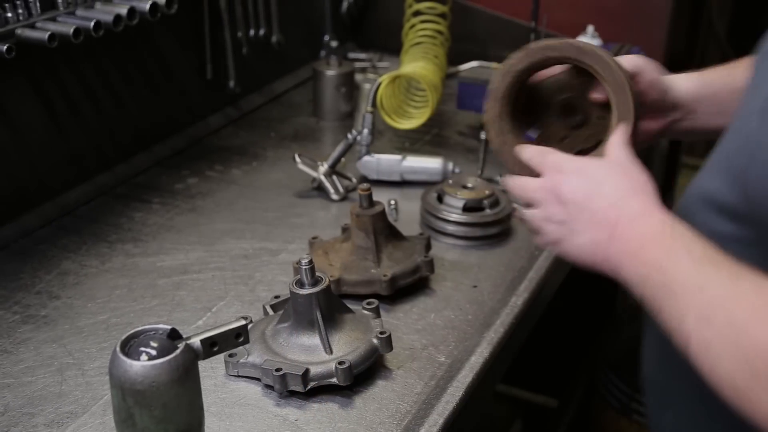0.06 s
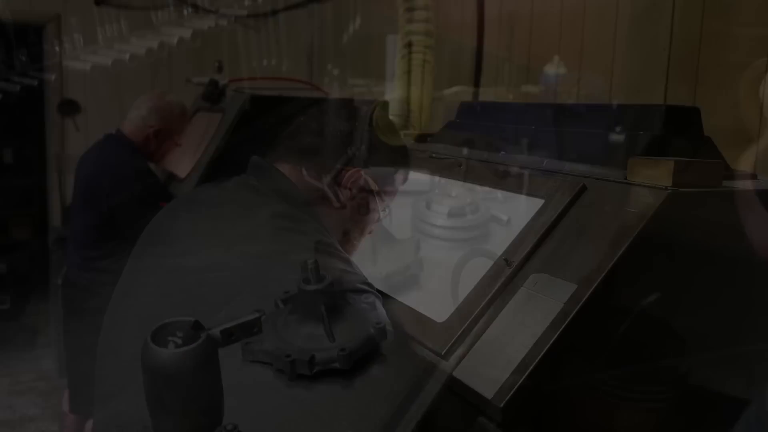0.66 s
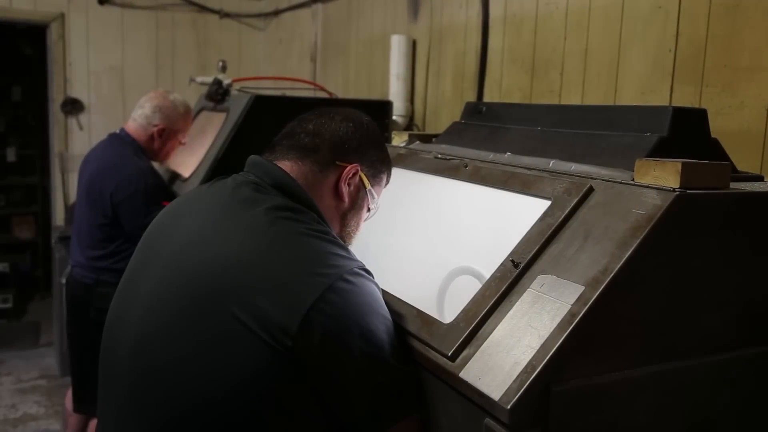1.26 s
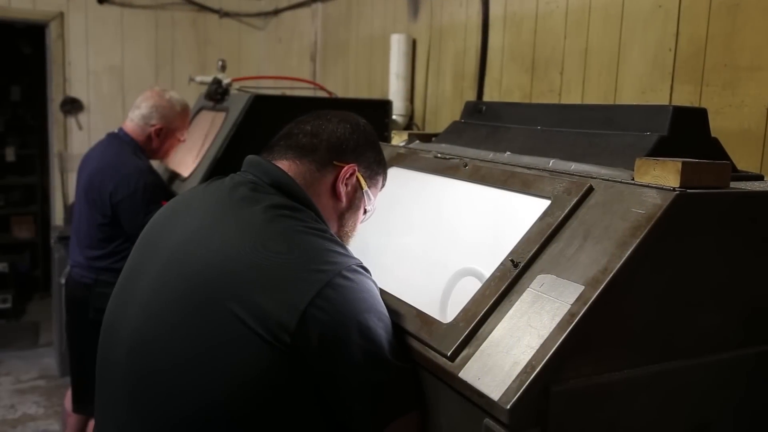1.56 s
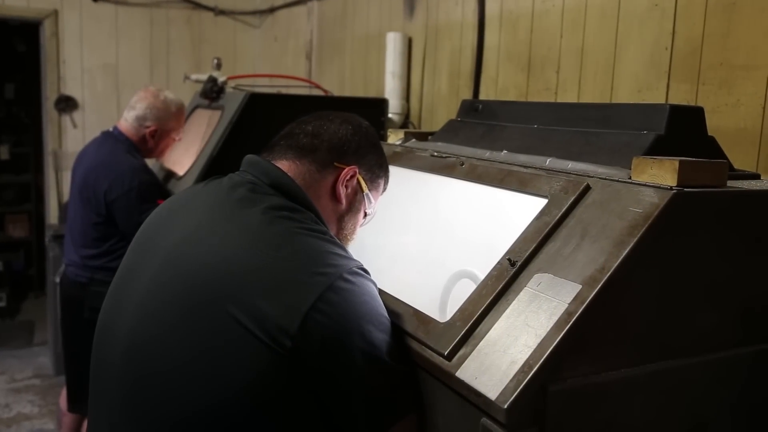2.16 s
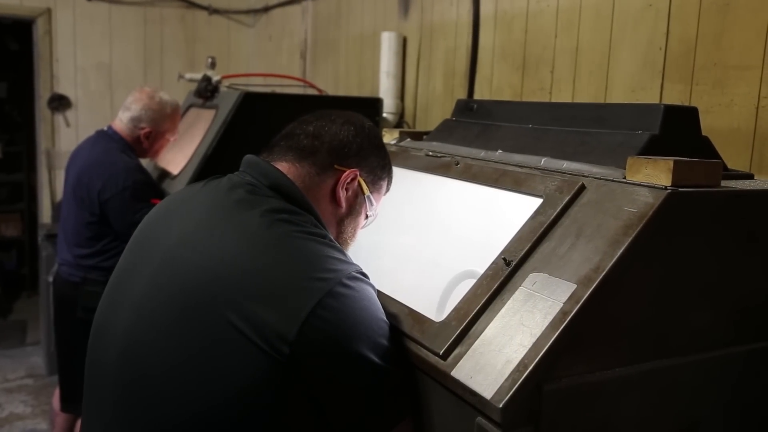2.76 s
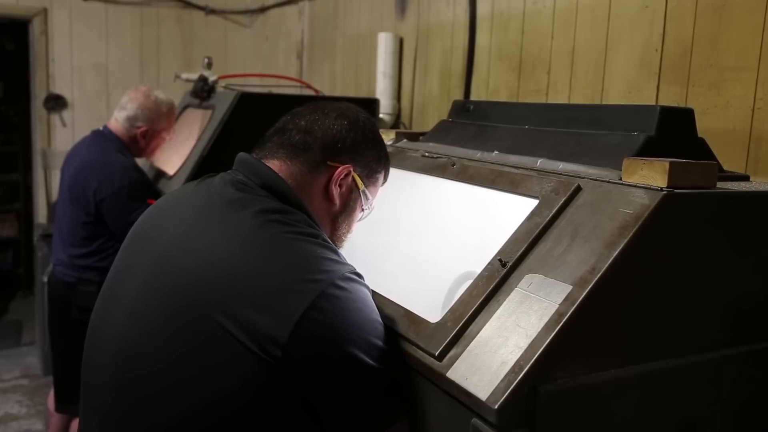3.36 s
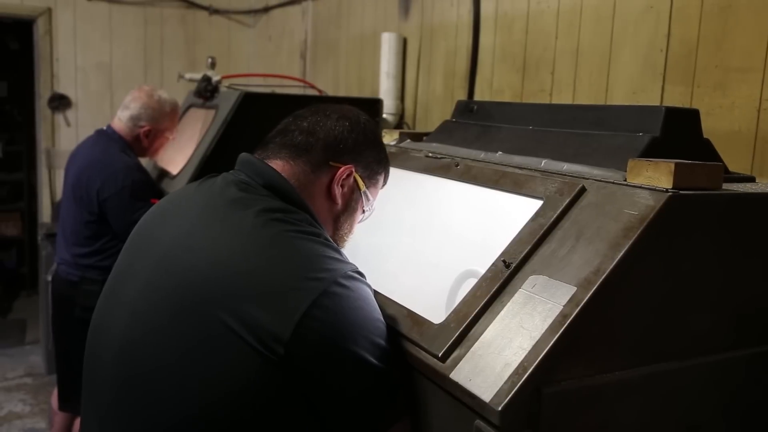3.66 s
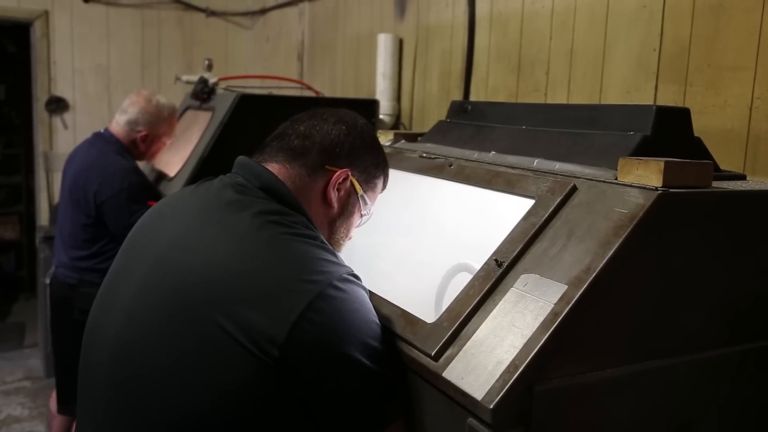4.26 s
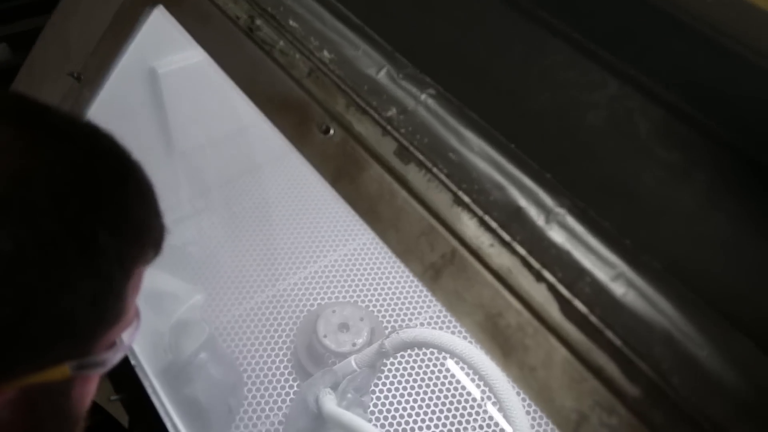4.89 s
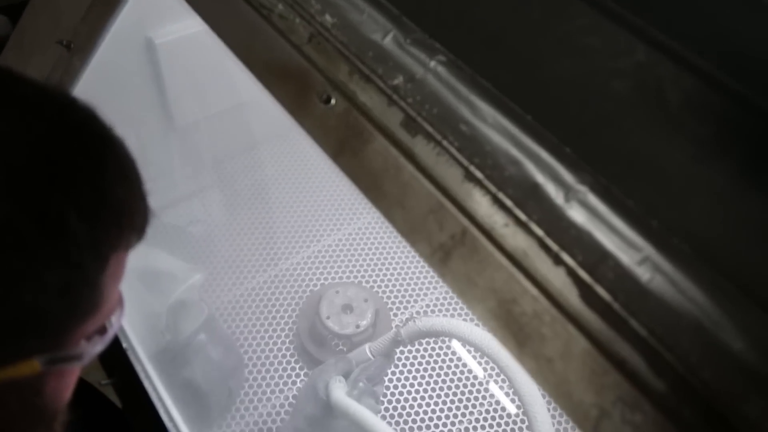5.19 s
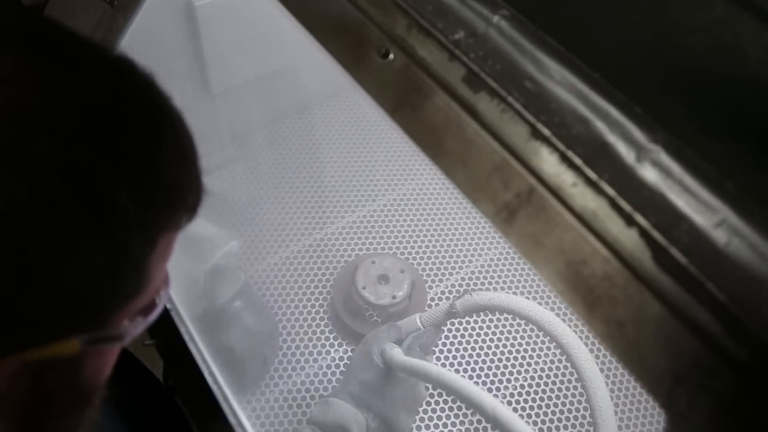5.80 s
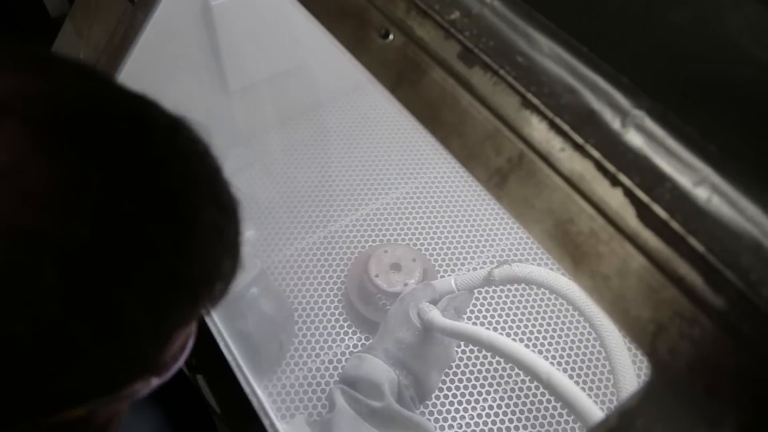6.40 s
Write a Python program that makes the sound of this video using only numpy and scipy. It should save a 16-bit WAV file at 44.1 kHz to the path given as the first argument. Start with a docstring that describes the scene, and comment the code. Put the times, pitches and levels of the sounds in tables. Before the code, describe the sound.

In a workshop, an air jet blasts grit against a metal part in a cabinet, making a steady hiss with a rushing body and a few short, faint whistles. An extractor fan's hum comes up within the first second and stays. The tone changes abruptly as the microphone position shifts, ending close to the spray, where a thin, bright sizzle swells in quick surges over a faint whine.

```python
"""Grit blasting in a steel cabinet

A metal part is blasted in a workshop, heard in mono from four places, one straight after the other:
the workbench, behind the operator, at the cabinet window, and a thin close-up of the spray.
The air jet roars, hisses and sings on the part's edges, grit sizzles on the metal as the nozzle sweeps,
and the dust extractor's fan hums at a steady pitch."""
import sys
import numpy as np
from scipy import signal
from scipy.fft import rfft, irfft
from scipy.io import wavfile
from scipy.ndimage import uniform_filter1d

SR = 44100
rng = np.random.default_rng(int(sys.argv[2]) if len(sys.argv) > 2 else 0)


def log_audio(samples):
    """Write samples as a 16-bit WAV file to the path given in sys.argv[1]."""
    # one column per channel
    frames = np.atleast_2d(samples).T
    # limit to full scale, then quantise
    limited = np.clip(frames, -1, 1)
    pcm = np.round(limited * 32767).astype(np.int16)
    wavfile.write(sys.argv[1], SR, pcm)


N = 292824
TIME = np.arange(N) / SR
FREQS = np.maximum(np.fft.rfftfreq(N, 1 / SR), 1)

# cuts from one listening place to the next: (time [s])
CUT_TIMES = [0.960, 4.432, 5.665]


def from_db(db):
    """Decibels to gain."""
    return np.exp(np.asarray(db) * (np.log(10) / 20))


def unit_rms(x):
    """Scale to unit rms."""
    return x / np.sqrt(np.mean(x ** 2) + 1e-20)


def automation(points):
    """Straight lines through (time, value) points, at every sample."""
    return np.interp(TIME, *np.transpose(points))


def drift(rate_hz):
    """Smooth random motion of unit rms, mostly slower than rate_hz."""
    step = 100
    size = N // step + 1
    rolloff = 1 + (np.fft.rfftfreq(size, step / SR) / rate_hz) ** 2
    slow = irfft(rfft(rng.standard_normal(size)) / rolloff, size)
    return np.interp(np.arange(N) / step, np.arange(size), unit_rms(slow))


def coloured(x, response):
    """x through a frequency response, at unit rms."""
    return unit_rms(irfft(rfft(x) * response, N))


def fan(partials, waver_db, wander):
    """Blade-passing tones: the speed barely wanders, and each partial wavers in the turbulent flow."""
    blade_hz = 354.65
    phase = 2 * np.pi * np.cumsum(blade_hz * (1 + wander * drift(5.5))) / SR
    out = np.zeros(N)
    for harmonic, db in partials:
        level = from_db(db + waver_db * drift(8.1))
        out += level * np.sqrt(2) * np.sin(harmonic * phase + 2 * np.pi * rng.random())
    return out


def dust_extractor(drone_db, surge_db):
    """The fan at the four places: a hum riding the drone or, close up, a whine swelling with surges."""
    # fan partials: (harmonic [x blade rate], relative level [dB])
    room_partials = [(1, -0.5), (2, -8.5), (3, 1.56), (4, -14.5), (5, -8.5), (6, -25), (8, -23)]
    window_partials = [(1, -8.5), (2, -8), (3, -0.5), (4, -4), (5, -3.5)]
    close_partials = [(5, -8.5), (10, -9), (15, 2.5), (20, 1.7), (25, -2), (35, -21)]
    room_hum = from_db(0.76 * drone_db) * fan(room_partials, waver_db=0.58, wander=0.00024)
    fade_in = np.clip((TIME - 0.55) / 0.44, 0, 1)  # the hum comes up on leaving the bench
    bench = from_db(-33) * fade_in * room_hum
    behind = from_db(-28.5) * room_hum
    window = from_db(-34 + drone_db) * fan(window_partials, waver_db=1.0, wander=0.00021)
    slow_surge_db = uniform_filter1d(surge_db, size=int(.15 * SR))
    close = from_db(-42 + 1.23 * slow_surge_db) * fan(close_partials, waver_db=1.1, wander=.00005)
    return bench, behind, window, close


def edge_tones():
    """Airy whistles: turbulence sings in a narrow band as the jet crosses an edge or a hollow."""
    # (time [s], pitch [Hz], bandwidth [Hz], peak level [dB], half length [s])
    whistles = [(0.433, 471, 12, -27, 0.04), (0.52, 5270, 400, -24, .035), (2.92, 5500, 110, -28.5, 0.055),
                (4.02, 6500, 200, -30, .03), (4.266, 1600, 900, -30.5, .1), (5.235, 5550, 450, -25, .03),
                (5.374, 5700, 140, -25, 0.079)]
    out = np.zeros(N)
    for peak_s, hz, width_hz, db, half_s in whistles:
        band = signal.butter(2, [hz - width_hz / 2, hz + width_hz / 2], "band", fs=SR, output="sos")
        swell = np.exp(-((TIME - peak_s) / half_s) ** 2 / 2)
        out += from_db(db) * swell * unit_rms(signal.sosfilt(band, rng.standard_normal(N)))
    return out


def cabinet(colour, modes):
    """Response of the path from the nozzle: broad colour plus cabinet and duct resonances."""
    hz, level_db = np.transpose(colour)
    broad_db = np.interp(np.log(FREQS), np.log(hz), level_db)
    peaks_db = sum(db / (1 + (2 * (FREQS - centre) / width) ** 2) for centre, width, db in modes)
    return from_db(broad_db + peaks_db)


def walls(x, echo_db, sway_s):
    """The steel walls mirror the spray; each echo's delay shifts as the nozzle moves."""
    out = x
    for lag_s in rng.uniform(.003, .025, 4):
        out = out + from_db(echo_db) * np.interp(TIME - lag_s - sway_s * drift(.7), TIME, x)
    return out


def surges():
    """Lift in dB: the blast builds as the jet sweeps onto the part and breaks off at its edge."""
    # (peak time [s], build-up [s], lift [dB])
    sweeps = [(0.42, .04, 1.9), (0.56, .06, 1), (0.78, .07, 0.5), (0.95, .05, 0.5), (1.37, 0.053, 0.5),
              (1.68, 0.068, 1.4), (2.46, .09, 0.5), (2.91, 0.05, 1.7), (3.17, .025, 1.7), (4.76, .05, 1.7),
              (5.02, 0.1, 2), (5.245, 0.074, 3.2), (5.48, .08, 2), (5.895, 0.037, 4), (6.08, .05, 6),
              (6.21, 0.086, 4), (6.325, 0.038, 6.5), (6.43, 0.059, 7.3), (6.56, .065, 4.5)]
    out = np.zeros(N)
    for peak_s, build_s, db in sweeps:
        from_peak = (TIME - peak_s) / np.where(TIME < peak_s, build_s, .35 * build_s)
        out += db * np.exp(-np.minimum(from_peak ** 2 / 2, 20))
    return out


def grit(per_s):
    """Countless tiny impacts of uneven strength."""
    return (rng.random(N) < per_s / SR) * rng.standard_normal(N)


def blast(path, controls, roar_db, hiss_db, sizzle_db, roar_per_surge,
          echo_db, sway_s, flutter_db, gust_db, impacts_per_s=25000):
    """Turbulent air gives the roar and hiss, grit impacts the sizzle; surges lift all three."""
    drone_db, aim_db, surge_db = controls
    roar_share = 1 / (1 + (FREQS / 2300) ** 8)
    sizzle_share = 1 / (1 + (8000 / FREQS) ** 12)
    hiss_share = (1 - roar_share) * (1 - sizzle_share)
    feed_db = flutter_db * drift(24)  # the uneven grit feed shakes hiss and sizzle together

    air = coloured(rng.standard_normal(N), path * np.sqrt(roar_share))
    roar = from_db(roar_db + drone_db + roar_per_surge * surge_db + gust_db * drift(14)) * air

    jet = coloured(walls(rng.standard_normal(N), echo_db, sway_s), path * np.sqrt(hiss_share))
    jet_top = irfft(rfft(jet) / (1 + (4400 / FREQS) ** 10), N)
    # the nozzle's aim trades low hiss for top hiss and sizzle
    top_hiss = from_db(surge_db + 0.19 * aim_db) * jet_top
    low_hiss = from_db(0.74 * surge_db + 0.55 * drone_db - 0.36 * aim_db) * (jet - jet_top)
    hiss = from_db(hiss_db + feed_db) * (top_hiss + low_hiss)

    impacts = coloured(walls(grit(impacts_per_s), echo_db, sway_s), path * np.sqrt(sizzle_share))
    sizzle = from_db(sizzle_db + aim_db + 0.57 * surge_db + feed_db) * impacts
    return roar + hiss + sizzle


def nozzle(drone_db, surge_db):
    """The blast as it reaches the four places: full-bodied at the bench, mostly sizzle close up."""
    # angle of the nozzle to the part: (time [s], sizzle gain [dB])
    aim = [(0.9, 1.5), (1.0, -2.5), (1.9, -3), (2.25, 0.5), (2.95, 2.5), (3.48, 1.8), (3.54, -2.7),
           (3.95, 0.2), (4.28, -2.5), (4.42, 1), (5.2, 0.5), (5.32, -2), (6.4, 2.5)]
    # broad colour of the blast: (frequency [Hz], relative level [dB])
    bench_colour = [(40, -27), (65, -33), (100, -19), (140, -13), (170, -11.5), (300, -4), (1000, -2.5),
                    (2200, -4.5), (4200, -4), (5500, -0.5), (8300, -13), (11000, -18), (13000, -23.5),
                    (15600, -34)]
    behind_colour = [(40, -38), (65, -29), (100, -19.5), (125, -18.5), (160, -5), (300, -14.5), (1000, -8),
                     (2200, -8.5), (4200, -3), (5500, 0.0), (8300, -10), (11000, -11), (13000, -13.5),
                     (15600, -24)]
    window_colour = [(40, -41.7), (65, -31), (100, -28), (125, -21.5), (160, -13), (300, -10.5),
                     (1000, -14), (2200, -14.5), (4200, -8.5), (5500, -2.5), (8300, -13.5), (11000, -14.5),
                     (13000, -17), (15600, -26)]
    close_colour = [(40, -43), (150, -38), (260, -37.5), (400, -20.5), (640, -18), (760, -11.5),
                    (1300, -1.5), (2600, -9), (4600, -6.5), (6500, -5.5), (9500, -6), (12000, -3.5),
                    (15600, 0.5)]
    # cabinet and duct resonances: (frequency [Hz], width [Hz], boost [dB])
    bench_modes = [(190, 34, 10.5), (460, 17, 6.5), (667, 40, 5.5), (1280, 52, 9.5), (1433, 27, 6),
                   (1656, 26, 10), (1796, 40, 6), (2050, 30, 9.5), (2450, 80, 4.5)]
    behind_modes = [(183, 20, 2.6), (311, 77, 10.7), (430, 160, 7), (702, 280, 6.4), (973, 21, 10.4),
                    (1095, 25, 5.5), (2666, 110, 2.8), (3330, 110, 3.6), (4920, 150, 2.1)]
    window_modes = [(414, 14, 3.4), (618, 28, 4.3), (1315, 14, 10.5), (1600, 32, 5.8), (2940, 720, 4.1),
                    (3860, 180, 7.6), (4600, 341, 4.4), (6540, 200, 3.5)]
    close_modes = [(294, 14, 7.2), (743, 88, 10), (966, 170, 7.4), (1385, 64, 6.5), (1670, 52, 8.3),
                   (2109, 190, 7.1), (2350, 42, 7), (3160, 630, 8.4)]
    controls = drone_db, automation(aim), surge_db
    bench = blast(cabinet(bench_colour, bench_modes), controls,
                  roar_db=-22.5, hiss_db=-18, sizzle_db=-28, roar_per_surge=.4,
                  echo_db=-12.5, sway_s=.00004, flutter_db=.48, gust_db=-.2)
    behind = blast(cabinet(behind_colour, behind_modes), controls,
                   roar_db=-27.5, hiss_db=-21.5, sizzle_db=-31, roar_per_surge=.24,
                   echo_db=-13, sway_s=.0001174, flutter_db=.42, gust_db=.6)
    window = blast(cabinet(window_colour, window_modes), controls,
                   roar_db=-29.5, hiss_db=-20, sizzle_db=-31, roar_per_surge=.2,
                   echo_db=-13.5, sway_s=.00005, flutter_db=.37, gust_db=.6)
    close = blast(cabinet(close_colour, close_modes), controls,
                  roar_db=-38.5, hiss_db=-36.5, sizzle_db=-29.6, roar_per_surge=.6,
                  echo_db=-9.5, sway_s=.00001, flutter_db=1.1, gust_db=.5, impacts_per_s=13000)
    return bench, behind, window, close


def dip():
    """The level drops at the first cut, eases up, then comes back quickly."""
    drop_db, ease_db_per_s, end_s, release_s = -5, 7, 1.29, .06
    since_cut = TIME - CUT_TIMES[0]
    held = (since_cut > 0) * np.clip((end_s - TIME) / release_s, 0, 1)
    return from_db(held * (drop_db + ease_db_per_s * since_cut))


def cut_between(places):
    """Each place gives way to the next in a 2 ms crossfade."""
    out = places[0]
    for cut_s, place in zip(CUT_TIMES, places[1:]):
        out = out + np.clip((TIME - cut_s) / .002 + .5, 0, 1) * (place - out)
    return out


def scene():
    """Fan and blast, cut from place to place, with the edge whistles on top."""
    # the low drone, where air roar and fan hum rise and fall together: (time [s], gain [dB])
    drone = [(0.3, -1.9), (0.8, 1), (1.05, 1), (1.5, 1), (2.05, 0), (2.22, -2.5), (2.38, 0), (4.02, 0.1),
             (4.2, 1.5), (4.55, 1), (4.98, 1.8), (5.33, -3.8), (5.56, -5), (5.8, -1)]
    drone_db, surge_db = automation(drone), surges()
    hums = dust_extractor(drone_db, surge_db)
    sprays = nozzle(drone_db, surge_db)
    places = [hum + spray for hum, spray in zip(hums, sprays)]
    mono = dip() * cut_between(places) + edge_tones()
    return np.stack([mono, mono])


def record(dry):
    """A steep low-pass takes off the very top."""
    cutoff_hz = 15750
    return signal.sosfilt(signal.ellip(12, .1, 90, cutoff_hz, fs=SR, output="sos"), dry)


dry = scene()
out = record(dry)
log_audio(out)
```